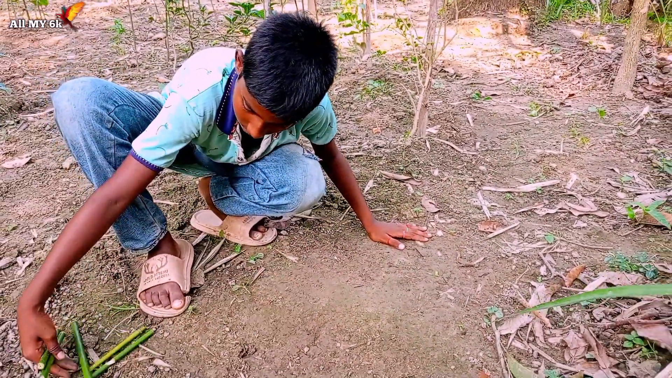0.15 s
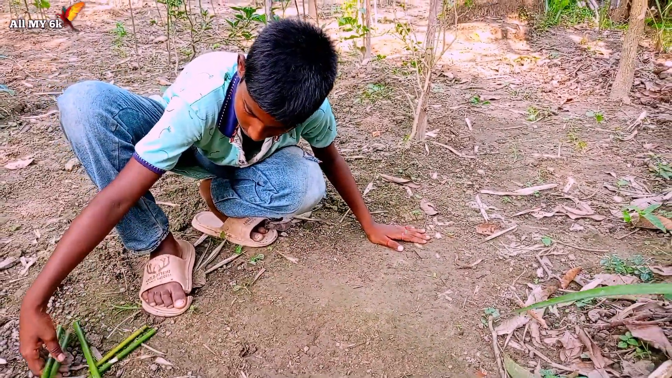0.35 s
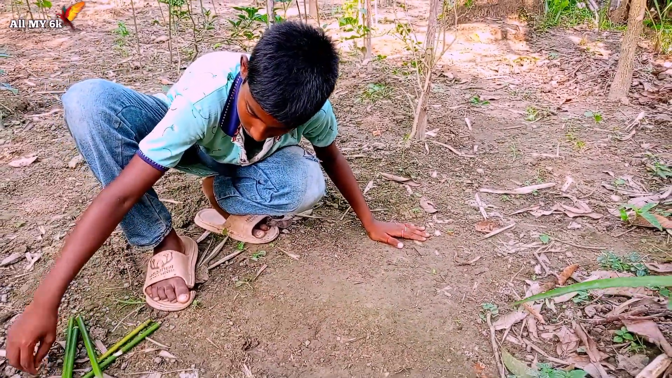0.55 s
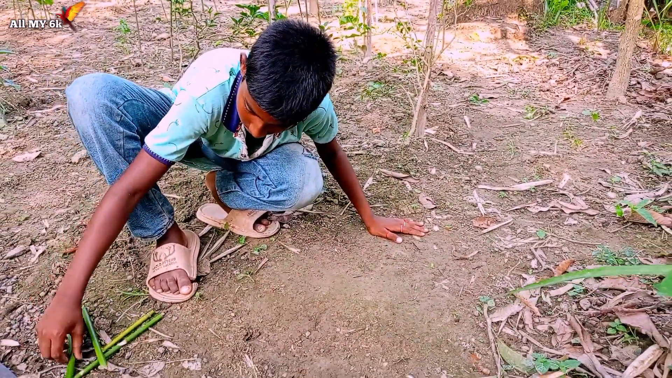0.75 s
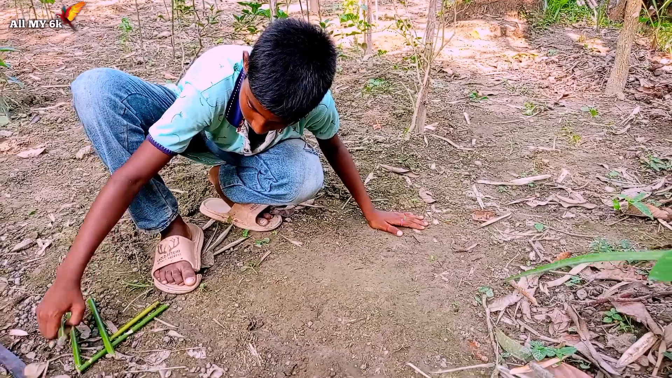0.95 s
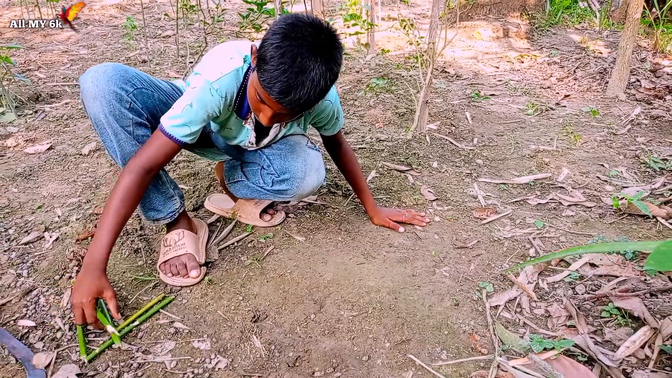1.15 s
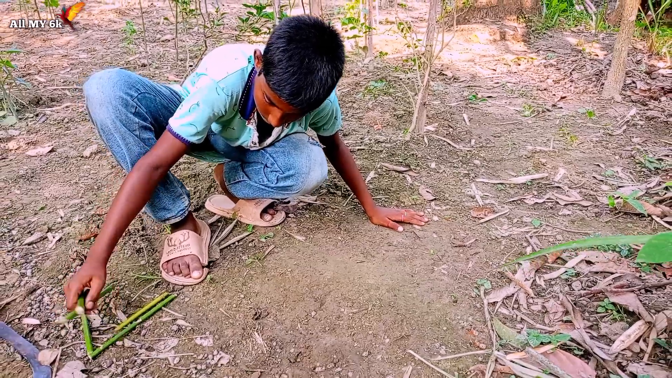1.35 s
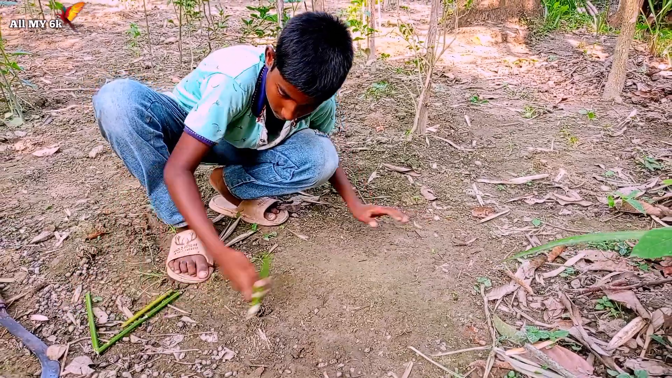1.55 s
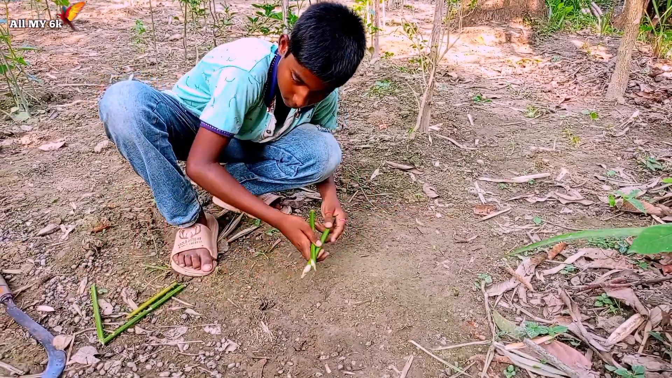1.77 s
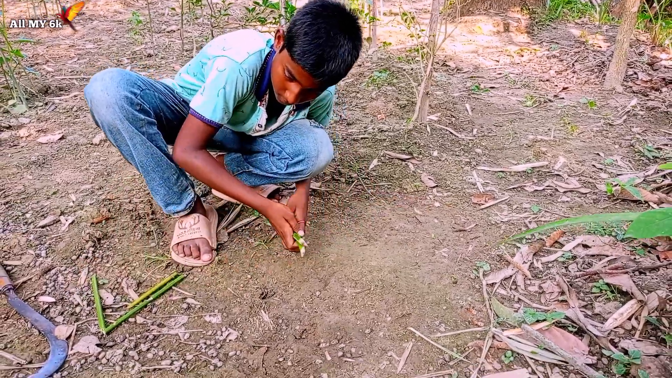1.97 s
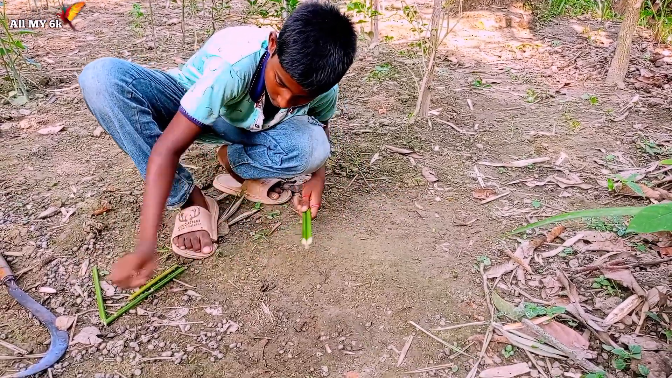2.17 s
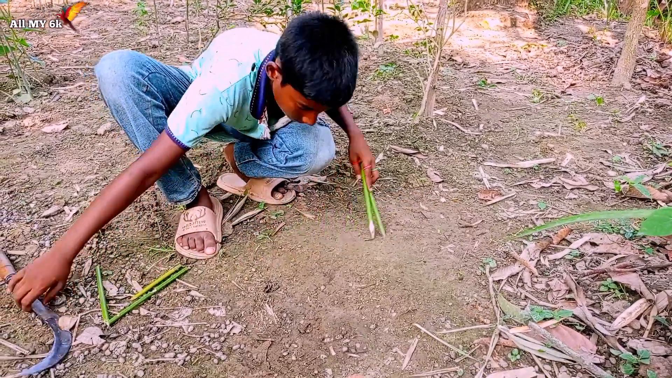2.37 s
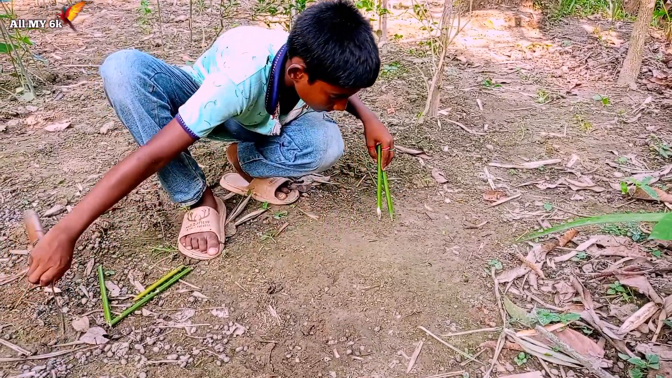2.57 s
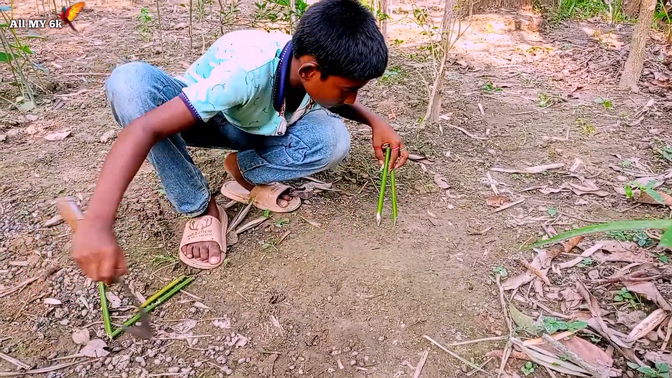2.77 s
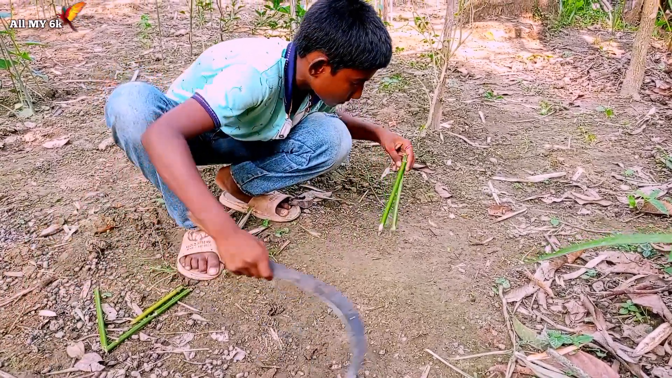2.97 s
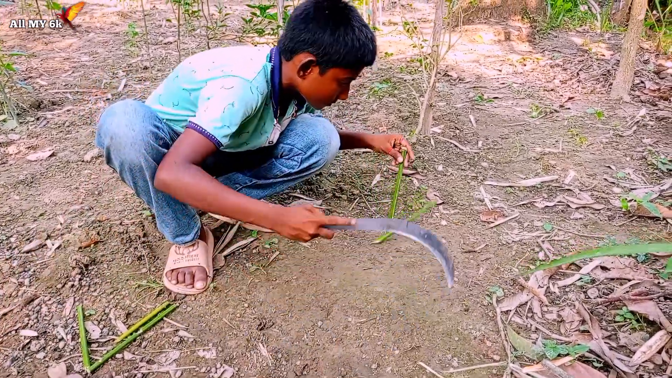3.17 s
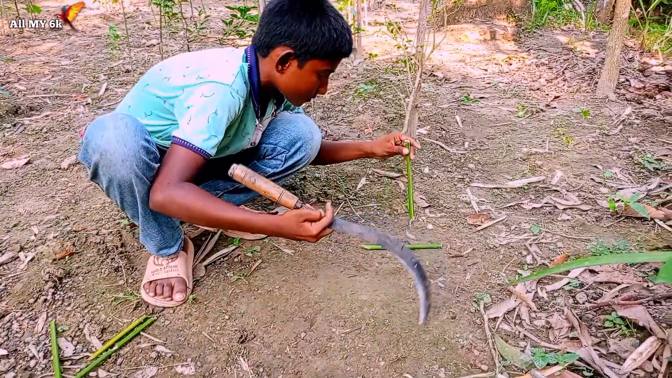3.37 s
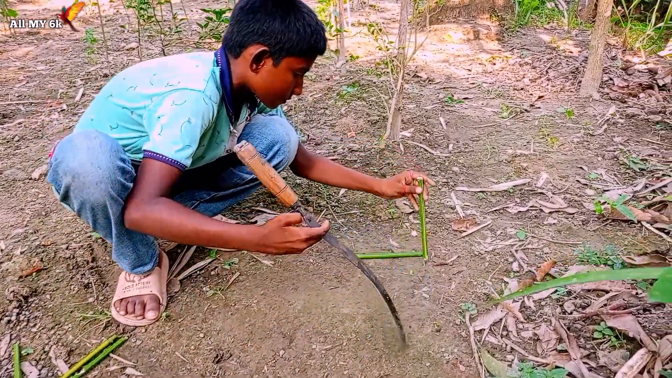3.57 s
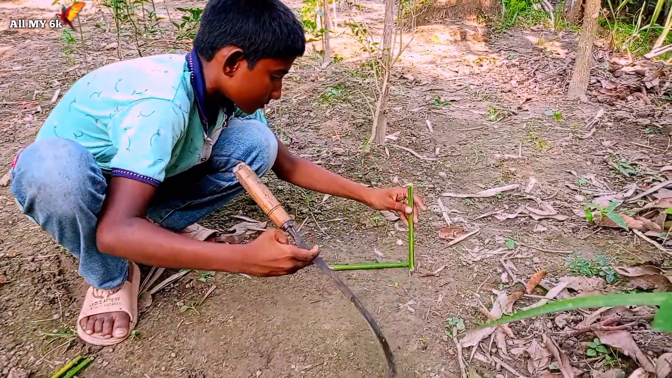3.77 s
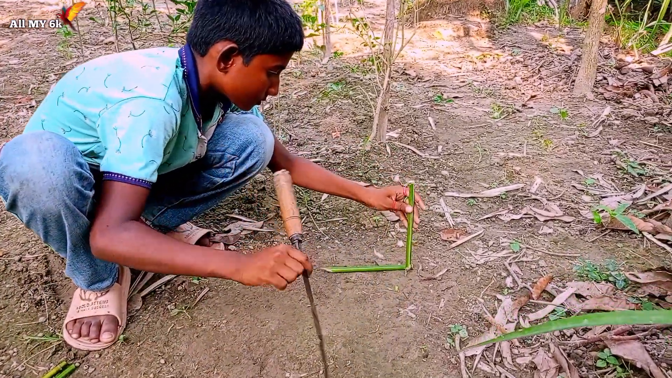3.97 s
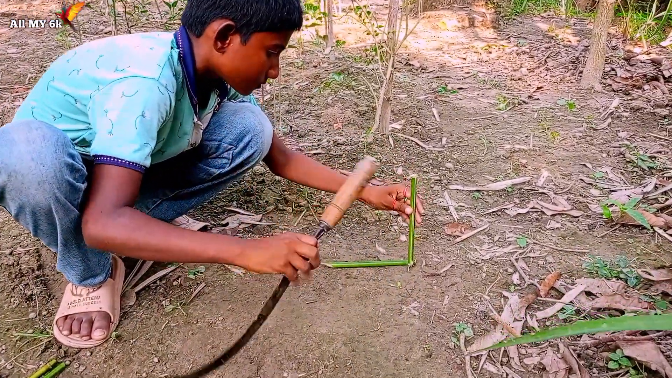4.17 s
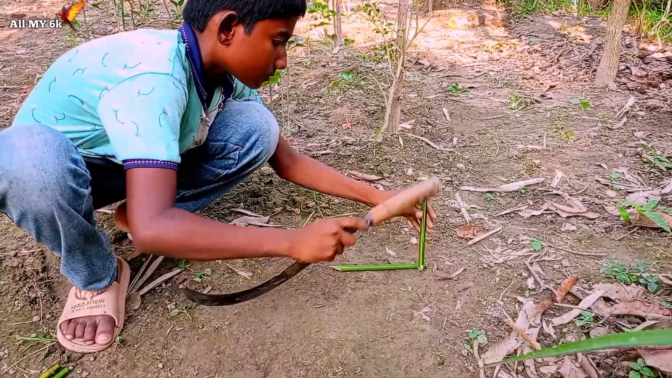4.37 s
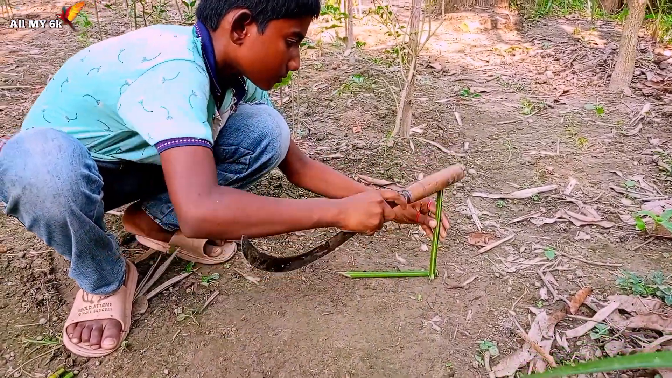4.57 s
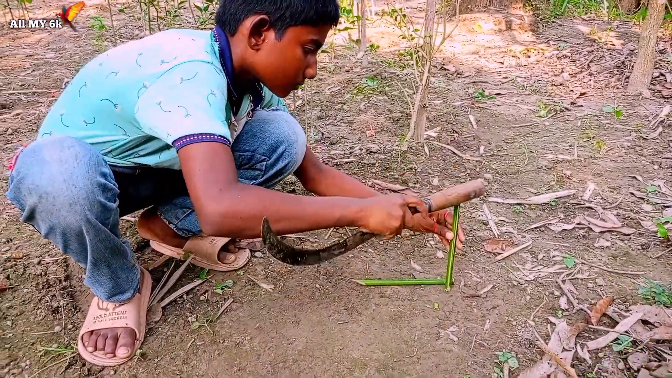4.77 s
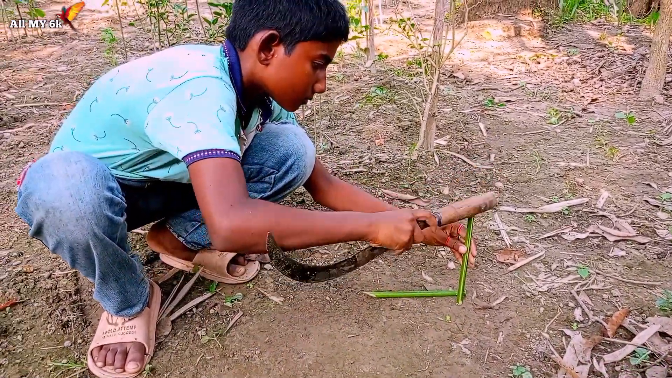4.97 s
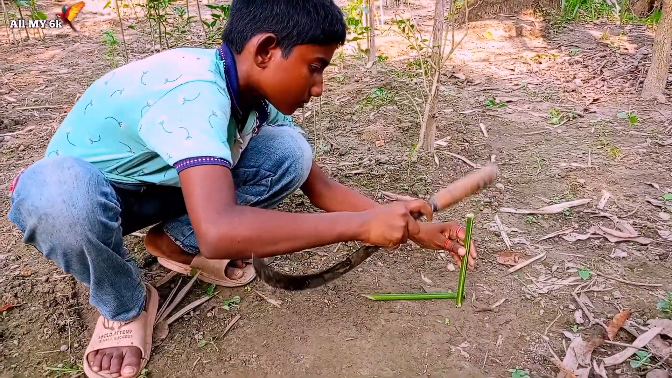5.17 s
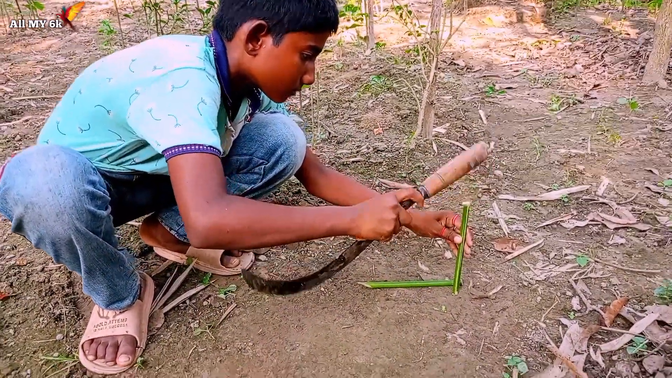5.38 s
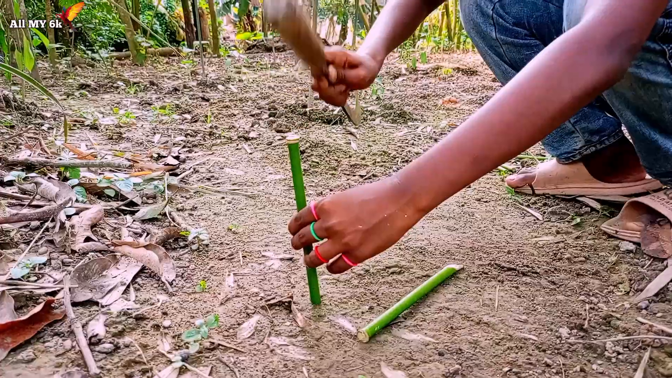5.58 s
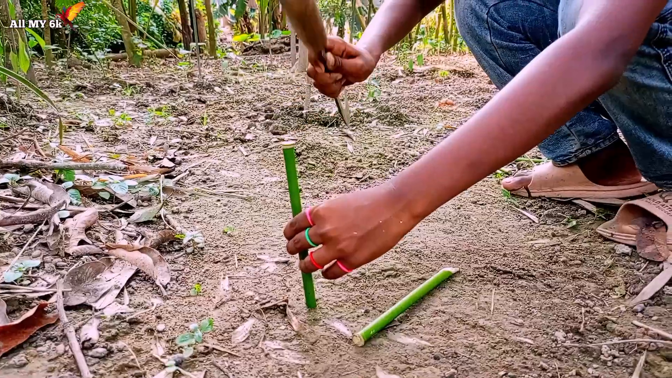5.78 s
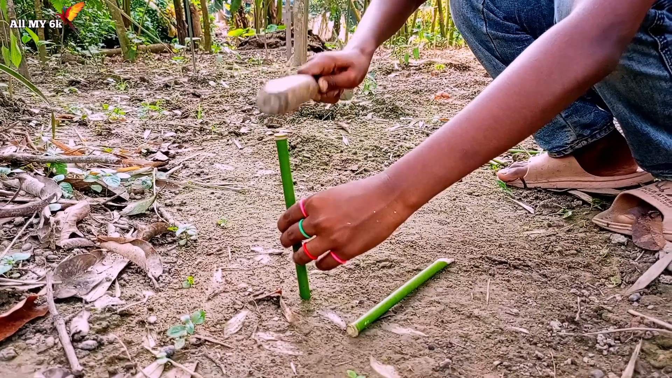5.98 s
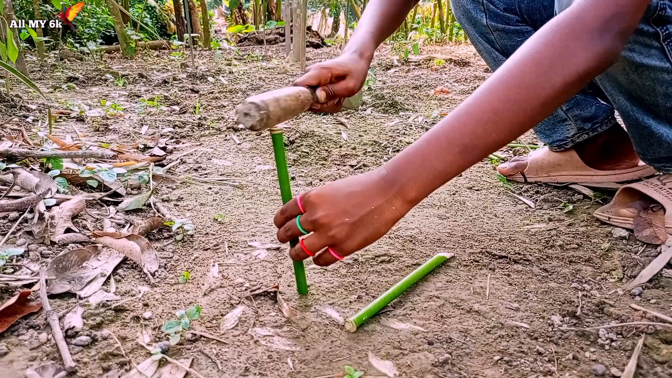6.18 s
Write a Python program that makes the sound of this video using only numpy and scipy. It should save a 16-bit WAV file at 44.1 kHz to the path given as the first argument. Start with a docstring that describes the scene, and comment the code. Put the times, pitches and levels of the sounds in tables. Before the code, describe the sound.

Close outdoor sound with faint scattered echo from trees. Small stick clinks come first, between two loud, pure, upward bird whistles that drop off at the end; fast dry chattering from a second bird fills the space between them. A dull poke into soil follows, then near quiet with faint distant birds. Finally eight strong woody knocks drive a bamboo stake into the ground, with short ringing, soil thuds and brief rustles.

```python
"""Driving bamboo stakes in a grove

Thin sticks clink and poke the dirt, then a sickle's wooden handle drives a green bamboo stake into dry soil:
damped modes and bursts of shaped noise. A koel clucks, then whistles twice close by, a bulbul chatters and
smaller birds call further off: gliding tones. Trees scatter the sounds as decaying noise; hiss bursts and a
background whose level dips lie beneath. The microphone clips whatever exceeds full scale."""
import sys
import numpy as np
from scipy import signal
from scipy.fft import rfft, irfft, next_fast_len
from scipy.io import wavfile
from scipy.ndimage import map_coordinates

SR = 44100
rng = np.random.default_rng(int(sys.argv[2]) if len(sys.argv) > 2 else 0)


def file_out(sig):
    """Save sig as 16-bit WAV at sys.argv[1]."""
    # one column per channel
    cols = np.atleast_2d(sig).T
    # limit, then scale
    lim = np.clip(cols, -1, 1)
    pcm = np.round(lim * 32767).astype(np.int16)
    wavfile.write(sys.argv[1], SR, pcm)


N = 274743  # samples


def amp(db):
    """The decibel is logarithmic: 20 dB is a tenfold gain."""
    return 10 ** (np.asarray(db) / 20)


def unit(x):
    """Effective level is the root mean square, scaled here to 1."""
    return x / np.sqrt(np.mean(x ** 2) + 1e-20)


def along(points, hz):
    """Spectra are read by interpolating (Hz, value) points on a logarithmic frequency axis."""
    f, value = np.transpose(points)
    return np.interp(np.log(hz + 1), np.log(f + 1), value)


def clock(length):
    """Sampled time: the instants, in seconds, of a stretch of sound."""
    return np.arange(int(length * SR)) / SR


def add(track, s, sound):
    """Superposition: sounds that overlap from time s on simply add."""
    part = track[max(round(s * SR), 0):][:len(sound)]
    part += sound[:len(part)]


def noise(spectrum, size):
    """Filtering white noise in the frequency domain gives it the wanted spectrum; its rms is 1."""
    m = next_fast_len(size)
    white = rfft(rng.standard_normal(m))
    gain = amp(along(spectrum, np.fft.rfftfreq(m, 1 / SR)))
    return unit(irfft(white * gain, m)[:size])


def wobble(t, rate):
    """Slow random modulation: a smooth curve through rate random knots a second."""
    knots = rng.standard_normal(int(t[-1] * rate) + 4)
    return map_coordinates(knots, [t * rate])


def ease(t, start, end):
    """A raised-cosine step from 0 to 1 between two times changes level without a click."""
    return np.sin(np.pi / 2 * np.clip((t - start) / (end - start), 0, 1)) ** 2


def ring(modes, t, pitch=1, scatter_db=1):
    """A struck body sums damped modes: here of alternating sign, with levels scattered at random."""
    total = np.zeros(len(t))
    for k, (hz, db, t60) in enumerate(modes):
        level_db = db + scatter_db * rng.normal() - 60 * t / t60
        total += (-1) ** k * amp(level_db) * np.sin(2 * np.pi * hz * pitch * t)
    return total


def grove(x, wet_db, bloom, linger=1):
    """Multiple scattering from trunks and leaves: convolution with noise that blooms, then decays by band.

    The tail builds up over bloom seconds; linger stretches its decay."""
    # Colour of the scattered sound. Each row: frequency in Hz, relative level in dB.
    scatter_colour = [(150, 0.5), (450, -5.5), (750, -11), (1400, -3.5), (2400, -7.5), (3600, -2),
                      (5000, -9.5), (14000, -5.5)]
    # Decay of the scattered sound. Each row: frequency in Hz, time to fall 60 dB in seconds at linger 1.
    scatter_t60 = [(200, 0.15), (900, 0.25), (1200, 0.4), (1450, 0.56), (3500, 0.58), (7000, 0.44),
                   (14000, 0.058)]
    hz, t, bands = signal.stft(rng.standard_normal(int(.7 * SR)), SR, nperseg=256)
    decay_s = linger * along(scatter_t60, hz)[:, None]
    fade_db = along(scatter_colour, hz)[:, None] - 60 * t / decay_s
    build_up = 1 - np.exp(-(t / bloom) ** 2)
    tail = signal.istft(bands * amp(fade_db) * build_up, SR, nperseg=256)[1]
    tail *= amp(0.29 * wobble(np.arange(len(tail)) / SR, 90))  # the echoes come in clumps
    # wet_db is the tail's gain over roughly 1 to 4 kHz
    mid_gain = np.sqrt(np.mean(abs(rfft(tail)[700:2800]) ** 2))
    response = amp(wet_db) * tail / mid_gain
    response[0] += 1  # the direct sound
    return signal.fftconvolve(x, response)


def background():
    """Broadband noise: a steady shaped hush whose level dips at times, with brief low rumbles."""
    # Spectrum of the hush. Each row: frequency in Hz, relative level in dB per Hz.
    hush_spectrum = [(25, -21.5), (65, -6), (120, -5.5), (210, -8.5), (500, -6.5), (1100, -3.5), (1320, 2),
                     (1600, -3), (2500, -3), (4100, -12), (4800, -17), (6000, -14.5), (7400, -31),
                     (9000, -20), (15000, -37)]
    # Drops in background level. Each row: start in seconds, length in seconds, change of level in dB.
    level_dips = [(0, 0.36, -5.5), (0.558, 0.096, -6.5), (3.911, 0.44, -7), (4.717, 0.047, -17),
                  (4.76, 1.72, -5)]
    # Soft low rumbles. Each row: start in seconds, length in seconds, level in dB.
    rumbles = [(1.52, 0.297, -63.5), (2.05, 0.23, -68)]
    # Their spectrum. Each row: frequency in Hz, relative level in dB per Hz.
    rumble_spectrum = [(25, -16), (68, 7), (110, -6), (250, -23.5), (1000, -69)]
    hush_db, edge_s = -60.5, 0.031
    t = np.arange(N) / SR
    dip_db = np.zeros(N)
    for s, length, db in level_dips:
        entered = ease(t - s, -edge_s, 0)
        left = ease(t - s - length, -edge_s / 2, edge_s / 2)
        dip_db += db * (entered - left)
    out = amp(hush_db + dip_db + 0.4 * wobble(t, 5.1)) * noise(hush_spectrum, N)
    for s, length, db in rumbles:
        swell = np.sin(np.pi * clock(length) / length)
        add(out, s, amp(db) * swell * noise(rumble_spectrum, len(swell)))
    return out


def hisses(grain_db=4.0):
    """Granular noise with fast random level changes: rustles, and the breathy treble of a bird's chip."""
    # Bursts of hiss: rustles and the treble of a chip. Each row: peak time in seconds, rise in seconds,
    # time to fall 60 dB in seconds, peak level in dB.
    bursts = [(.01, 0.013, 0.32, -55), (0.056, 0.0022, .04, -42), (.215, 0.0033, 0.07, -54.5),
              (0.699, .006, 0.082, -55.5), (1.787, 0.0055, .25, -52.5), (4.659, 0.0071, .08, -54),
              (5.39, .012, 0.044, -43), (5.765, .025, 0.33, -43)]
    # Spectrum of the hiss. Each row: frequency in Hz, relative level in dB per Hz.
    hiss_spectrum = [(500, -6.5), (1500, -4.5), (3500, 2.5), (7000, -4), (9200, 1.5), (11500, -11.5),
                     (15500, -5)]
    out, t = np.zeros(N), clock(1 / 2)
    for s, rise, t60, db in bursts:
        start = max(s - 2 * rise, 0)
        since = start + t - s  # time relative to the peak
        shape_db = np.where(since < 0, -10 * (since / rise) ** 2, -60 * since / t60)
        grains = noise(hiss_spectrum, len(t)) * amp(grain_db * wobble(t, 750))
        add(out, start, amp(db + shape_db) * unit(grains))
    return out


def slur(length, start_hz, end_hz, octave_db, waver, rasp_db=0):
    """Frequency modulation: a swelling glide with its octave, wavering in pitch and roughened in level."""
    t = clock(length)
    u = t / length
    glide_hz = start_hz + (end_hz - start_hz) * np.sin(u * np.pi / 2)
    pitch = glide_hz * (1 + waver * wobble(t, 250))
    phase = 2 * np.pi * np.cumsum(pitch) / SR
    swell = np.sin(np.pi * u) * unit(amp(rasp_db * wobble(t, 760)))
    return np.sqrt(2) * swell * (np.sin(phase) + amp(octave_db) * np.sin(2 * phase))


def bird_notes():
    """Direct-to-reverberant ratio conveys distance: the bulbul is near, chips and whistles are mostly echo."""
    # The bulbul's rising slurs. Each row: start in seconds, length in seconds, top pitch in Hz, level in dB.
    chatter = [(1.97, 0.018, 4020, -31), (2.028, 0.011, 3790, -28.5), (2.084, .014, 3100, -35.5),
               (2.116, 0.0096, 3950, -31), (2.187, .024, 3600, -34), (2.245, 0.006, 3600, -30.5),
               (2.284, .012, 3600, -37.5), (2.341, 0.021, 3300, -30), (2.406, .01, 3590, -38.5),
               (2.444, .008, 3510, -32), (4.427, .017, 3714, -36.5), (4.481, 0.007, 3430, -35)]
    # Its quick flicks back down. Each row: start in seconds, level in dB.
    flicks = [(2.011, -30.5), (2.054, -32), (2.133, -36.5), (2.462, -39), (4.52, -41.5)]
    # Its low falling notes. Each row: start in seconds, length in seconds, start pitch in Hz, level in dB.
    falls = [(2.184, .03, 2411, -41), (2.249, .058, 2048, -39.5)]
    # Short rising chips, and the koel's small cluck before its first call.
    # Each row: start in seconds, top pitch in Hz, level in dB.
    chips = [(.687, 1400, -39), (1.776, 5610, -40.5), (1.813, 5540, -47), (4.175, 5230, -53),
             (5.745, 2677, -37.5)]
    # Distant whistles and hoots that sag in pitch. Each row: start in seconds, length in seconds,
    # start pitch in Hz, level in dB.
    whistles = [(.04, 0.086, 5350, -68), (0.34, .12, 6040, -71), (1.187, 0.088, 6060, -59.5),
                (1.237, 0.36, 5230, -64.5), (1.976, 0.14, 7420, -48), (2.199, .12, 7050, -53.5),
                (2.405, 0.024, 6960, -51), (2.973, 0.43, 5140, -67.5), (3.544, 0.27, 6080, -73),
                (4.484, 0.042, 7030, -47.5), (4.496, .034, 6150, -51), (5.485, 0.051, 589, -56),
                (5.8, 0.28, 750, -52), (5.848, 0.0706, 2675, -47), (5.901, 0.042, 5320, -48.5),
                (6, 0.159, 671, -59)]
    slur_start, chip_start = .75, .92  # starting pitch as a share of the top
    flick_s, flick_from_hz, flick_to_hz, fall_end_hz = .008, 3900, 2700, 1714
    chip_s = .017
    sag_hz, sag_share = 85, .02  # fall over a whistle: a fixed part plus a share of its pitch
    quaver_hz = 22  # fixed part of the waver: low notes quaver the most for their pitch

    near, far = np.zeros(N), np.zeros(N)
    notes = [(s, length, slur_start * hz, hz, db) for s, length, hz, db in chatter]
    notes += [(s, flick_s, flick_from_hz, flick_to_hz, db) for s, db in flicks]
    notes += [(s, length, hz, fall_end_hz, db) for s, length, hz, db in falls]
    for s, length, start_hz, end_hz, db in notes:
        note = slur(length, start_hz, end_hz, octave_db=-32.5, waver=0.029, rasp_db=2.0)
        add(near, s, amp(db) * note)
    for s, top_hz, db in chips:
        chip = slur(chip_s, chip_start * top_hz, top_hz, octave_db=-14, waver=0.039, rasp_db=4.0)
        add(far, s, amp(db) * chip)
    for s, length, hz, db in whistles:
        end_hz = hz * (1 - sag_share) - sag_hz
        whistle = slur(length, hz, end_hz, octave_db=-32, waver=.017 + quaver_hz / hz, rasp_db=2.0)
        add(far, s, amp(db) * whistle)
    return (grove(near, wet_db=-7.0, bloom=0.002) + grove(far, wet_db=3, bloom=0.0079))[:N]


def twitter(count=18, db=-68, low_hz=2500, high_hz=7000):
    """Attenuation rises with frequency: of the faint stray notes, higher ones tend to be weaker."""
    out = np.zeros(N)
    for when, height, size, bend, length in rng.random((count, 5)):
        hz = low_hz * (high_hz / low_hz) ** height
        end_hz = hz * (.95 + .1 * bend)
        note = slur(.03 + .06 * length, hz, end_hz, octave_db=-50, waver=.015)
        add(out, when * N / SR, amp(db + 4 * size - 8 * height) * note)
    return grove(out, wet_db=5.0, bloom=0.0071)[:N]


def sticks():
    """Impact excites free vibration: thin sticks clink with a brief scrape, or their points knock the dirt."""
    # Touches of loose sticks. Each row: start in seconds, clink level in dB, clink pitch factor,
    # dull knock level in dB.
    taps = [(0.2095, -33, 1.037, -65), (0.5105, -19.5, 1.02, -86.5), (.951, -39.5, 1, -51),
            (3.3168, -39.5, 0.76, -13)]
    # Modes of a thin stick. Each row: frequency in Hz before the pitch factor, relative level in dB,
    # time to fall 60 dB in seconds.
    stick_modes = [(1915, -14, 0.04), (2180, -10, 0.052), (2397, 2, 0.048), (2610, -11, 0.043),
                   (3156, -16.5, 0.0066), (4003, 0, 0.044), (4140, -6.5, 0.035), (5760, -16.5, 0.055),
                   (5620, -12, .028), (7360, -18, 0.025), (9220, -29.5, .02)]
    # Modes of a stick's point meeting the ground. Each row: frequency in Hz, relative level in dB,
    # time to fall 60 dB in seconds.
    dirt_modes = [(458.4, -5, 0.029), (719, -12, 0.016), (1249, -14, 0.0094), (1910, -7, .014),
                  (2220, -3.5, .012), (2740, 1, 0.015)]
    # Scrape of stick on stick. Each row: frequency in Hz, relative level in dB per Hz.
    scrape_spectrum = [(600, -35.5), (1700, -13), (2400, 2.5), (3200, -10), (4200, 3.5), (5000, -17.5),
                       (6100, -3), (8000, -22.5), (9200, -16.5), (12000, -31.5)]
    out, t = np.zeros(N), clock(1 / 4)
    onset = 1 - np.exp(-t / .002)
    for s, clink_db, pitch, knock_db in taps:
        scrape = amp(-3 - 60 * t / .028) * noise(scrape_spectrum, len(t))
        clink = ring(stick_modes, t, pitch) + scrape
        knock = ring(dirt_modes, t)
        tap = (amp(clink_db) * clink + amp(knock_db) * knock) * onset
        add(out, s, grove(tap, wet_db=-37, bloom=.02))
    return out


def koel(waver=0.007, wet_db=-9, flicker_db=4):
    """Harmonics grow with effort: an almost pure whistle settles low, climbs, drops and hangs in the trees."""
    # The koel's calls. Each row: start in seconds, low note in Hz, top note in Hz, low note level in dB,
    # top note level in dB, start of the climb in seconds, opening leap in Hz, dip between syllables in dB.
    calls = [(.713, 1158, 1414, -12.5, -7, .12, 0, 11), (2.501, 1240, 1455, -9.5, -7, .08, 260, 4)]
    # Overtones at the loudest moment. Each row: multiple of the fundamental,
    # level in dB relative to it before a random flicker.
    overtone_levels = [(2, -47), (5, -61), (6, -65), (7, -64), (8, -64)]
    call_s, release_s, fade_db_per_s = .435, 0.042, 95
    scoop_hz, scoop_s = 101, .02  # the whistle leaps past its low note and slides back onto it
    attack_s, attack_db = .088, 35  # it swells out of near silence
    climb_curve = 1.6  # bends the climb to start more slowly
    top_s, drop_s, drop_hz_per_s, turn_s = 0.31, .339, 6440, .008  # it tops out, turns over and falls away
    break_s, break_width_s = .225, .032  # it eases off between its two syllables

    out, t = np.zeros(N), clock(call_s)
    scoop = scoop_hz * t / scoop_s * np.exp(1 - t / scoop_s)
    drop = drop_hz_per_s * turn_s * np.logaddexp(0, (t - drop_s) / turn_s)
    attack = attack_db * np.maximum(1 - t / attack_s, 0) ** 2
    fade = fade_db_per_s * np.maximum(t - top_s, 0)
    for s, low_hz, top_hz, low_db, top_db, climb_s, leap_hz, break_db in calls:
        climb = ease(t, climb_s, top_s) ** climb_curve
        leap = leap_hz * (1 - ease(t, 0, scoop_s))
        hz = low_hz - leap + scoop + (top_hz - low_hz) * climb - drop
        phase = 2 * np.pi * np.cumsum(hz * (1 + waver * wobble(t, 70))) / SR
        dip = break_db * np.exp(-((t - break_s) / break_width_s) ** 2)
        db = low_db + (top_db - low_db) * climb - attack - dip - fade
        loudness = amp(db) * ease(call_s - t, 0, release_s) * ease(t, 0, scoop_s / 2)
        overtones = np.zeros(len(t))
        for multiple, level in overtone_levels:
            overtones += amp(level + flicker_db * wobble(t, 44)) * np.sin(round(multiple) * phase)
        effort = loudness / loudness.max()
        whistle = unit(np.sin(phase) + overtones * effort) * loudness
        add(out, s, grove(whistle, wet_db, bloom=0.013, linger=1.0))
    return out


def hammering():
    """Contact stiffness sets an impact's bandwidth: each blow knocks, rings the stake and drives the soil."""
    # Blows on the stake and two soft rebounds. Each row: start in seconds, strength in dB, hardness of contact
    # from 0 to 1, knock pitch factor, bamboo ring in dB, grove scatter in dB.
    blows = [(4.6421, -9.5, 0.06, 1.005, -12.5, -39.5), (4.8522, -5, 0.06, 1.102, -7.5, -25),
             (5.0621, -4.5, .92, 1.04, 0.5, -22.5), (5.2935, -3, 0.06, .93, -11, -30.5),
             (5.4298, -2.5, .84, 0.99, -4.5, -22.5), (5.692, 0, .86, 1.177, -10.5, -14.5),
             (5.713, -25.5, 0, 1, -18.5, -31), (5.9598, -7, 0.99, 1.047, -7.5, -12),
             (5.981, -30, 0, 1.3, -27.5, -23), (6.2235, -3.5, 1, 0.99, -20.5, -4)]
    # Knock of handle on stake. Each row: frequency in Hz before the pitch factor, relative level in dB,
    # time to fall 60 dB in seconds.
    wood_modes = [(967, -18.5, 0.075), (1288, -7.5, 0.021), (1570, -5, 0.034), (1770, 0, 0.015),
                  (2138, -3, 0.021), (2500, -17, 0.04), (2780, -15, 0.0049), (3189, -14, 0.013)]
    # The stake's own ring. Each row: frequency in Hz before detuning, relative level in dB (the third mode's
    # at seated_s), time to fall 60 dB in seconds.
    bamboo_modes = [(955.5, -6.5, 0.11), (1630, -21.5, 0.069), (3537, -5.5, 0.061), (4660, -13, 0.045),
                    (6370, -21, 0.022), (9800, -45, 0.07)]
    # Soil giving way under the point. Each row: frequency in Hz, relative level in dB,
    # time to fall 60 dB in seconds.
    soil_modes = [(398, -33, 0.031), (449.4, -27.5, 0.0029), (647, -29, 0.06), (629, -10.5, 0.013),
                  (846, -8, 0.022), (971, -10.5, 0.036)]
    # The ground under it. Each row: frequency in Hz, relative level in dB, time to fall 60 dB in seconds.
    thump_modes = [(151, -8, 0.033), (218.7, -3.5, 0.0054)]
    # The wood's crowd of short-lived modes. Each row: frequency in Hz, relative level in dB per Hz.
    clack_spectrum = [(400, -29), (1200, -7), (2000, 4.5), (3400, -3), (4300, -15.5), (6500, -18),
                      (15000, -38.5)]
    # Crack of the blow. Each row: frequency in Hz, relative level in dB per Hz.
    crack_spectrum = [(200, -17.5), (900, 9), (2500, 8.5), (4500, -4), (6500, -1.5), (9000, -13),
                      (15000, -31.5)]
    # A stake that yields takes the blow softly; one that sticks cracks and shakes the ground.
    # Each pair: value at soft contact, value at hard contact; a cutoff in Hz, then three levels in dB.
    sharp_ends = (1670, 4200)
    soil_ends = (8, -10.5)
    crack_ends = (-19.5, -5.5)
    thump_ends = (-43, -11.5)
    clack_db, clack_t60, crack_t60 = -9, 0.029, 0.006  # decays in seconds
    bounce_s, bounce_db = .0027, -10  # the ground mirrors the sound
    radiate_hz = 300  # a thin stake radiates little bass
    seated_s, clang_db_per_s = 5.35, 11.5  # the deeper the stake sits, the louder its third mode rings

    out, t = np.zeros(N), clock(1 / 2)
    for s, db, hardness, pitch, ring_db, grove_db in blows:
        sharp_hz = np.interp(hardness, (0, 1), sharp_ends)
        soil_db = np.interp(hardness, (0, 1), soil_ends)
        crack_db = np.interp(hardness, (0, 1), crack_ends)
        thump_db = np.interp(hardness, (0, 1), thump_ends)
        clack = amp(clack_db - 60 * t / clack_t60) * noise(clack_spectrum, len(t))
        knock = ring(wood_modes, t, pitch) + clack
        # a softer contact lasts longer and leaves the high modes quiet
        blow = signal.lfilter(*signal.butter(2, sharp_hz, fs=SR), knock)
        modes = np.array(bamboo_modes)
        modes[2, 1] += clang_db_per_s * (s - seated_s)
        # the stake's pitch varies slightly at random from blow to blow
        stake = ring(modes, t, pitch=1 + 0.0013 * rng.normal(), scatter_db=2.5)
        blow += amp(ring_db) * stake + amp(soil_db) * ring(soil_modes, t)
        blow += amp(crack_db - 60 * t / crack_t60) * noise(crack_spectrum, len(t))
        blow = signal.lfilter(*signal.butter(3, radiate_hz, "high", fs=SR), blow)
        blow += amp(bounce_db) * np.interp(t - bounce_s, t, blow, left=0)
        blow += amp(thump_db) * ring(thump_modes, t)  # the bass comes from the ground
        add(out, s, grove(amp(db) * blow, grove_db, bloom=0.029, linger=0.48))
    return out


def scene():
    """Superposition of the background, the work on the ground and the birds, as one channel."""
    birds = bird_notes() + twitter() + koel()
    work = hisses() + sticks() + hammering()
    return (background() + birds + work)[None]


def record(dry):
    """Overload and band limiting: the microphone clips at full scale and keeps nothing from top_hz up."""
    top_hz = 16500
    m = next_fast_len(N + SR // 2)
    passed = np.fft.rfftfreq(m, 1 / SR) < top_hz
    return irfft(rfft(np.clip(dry, -1, 1), m) * passed, m)[..., :N]


dry = scene()
out = record(dry)
file_out(out)
```